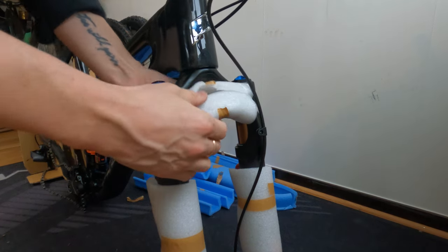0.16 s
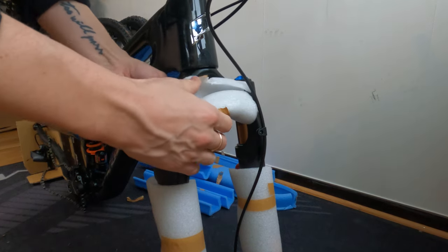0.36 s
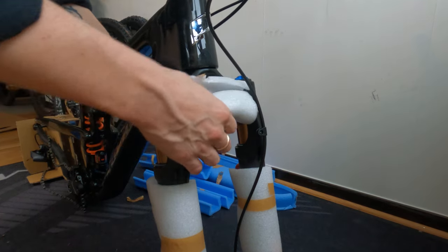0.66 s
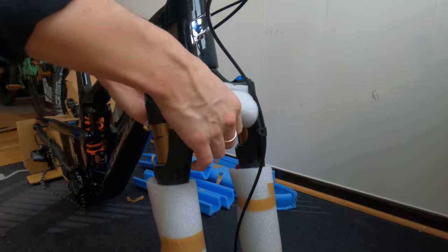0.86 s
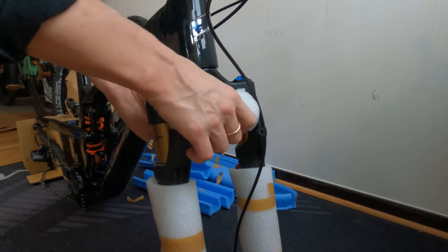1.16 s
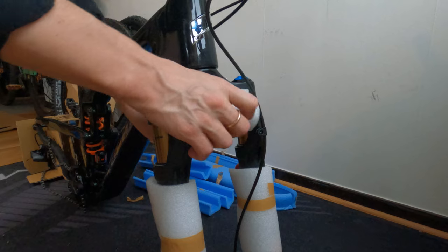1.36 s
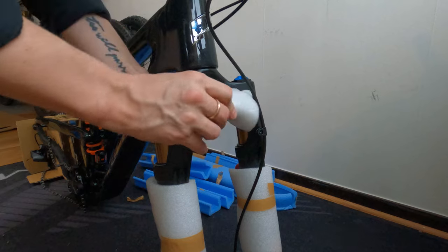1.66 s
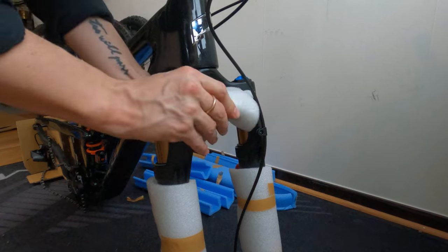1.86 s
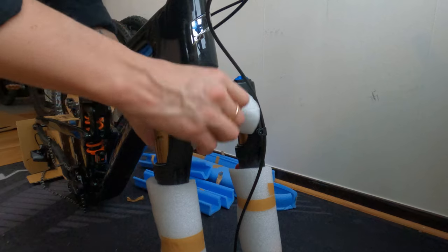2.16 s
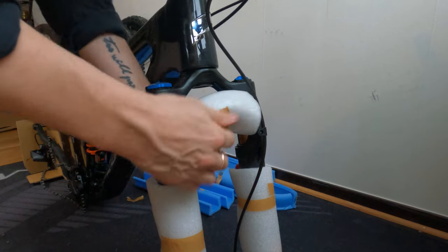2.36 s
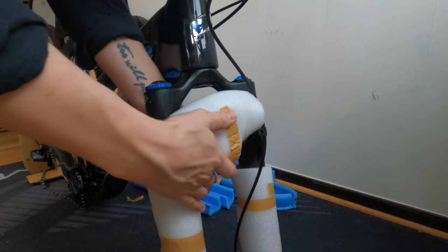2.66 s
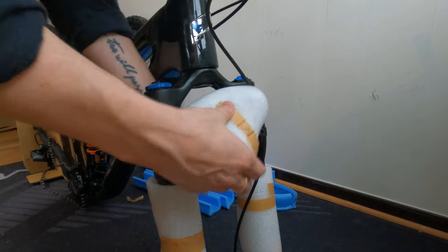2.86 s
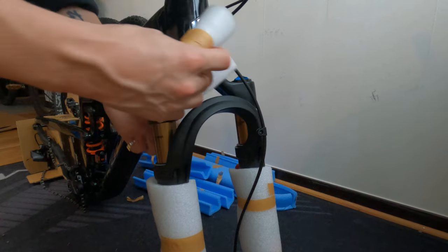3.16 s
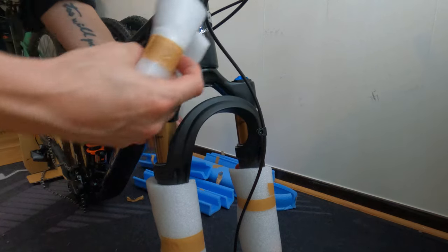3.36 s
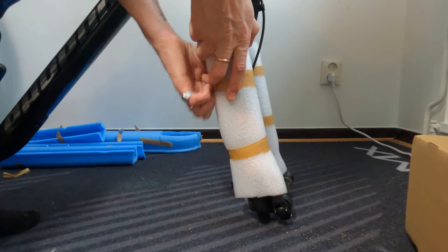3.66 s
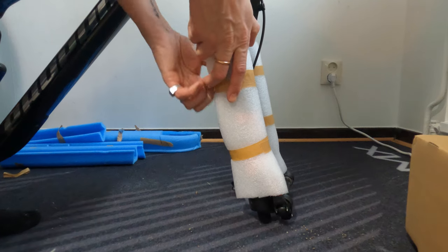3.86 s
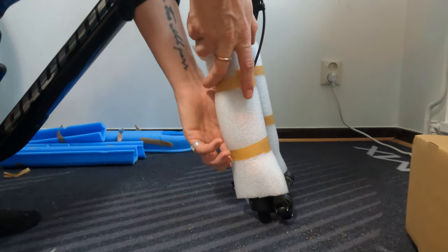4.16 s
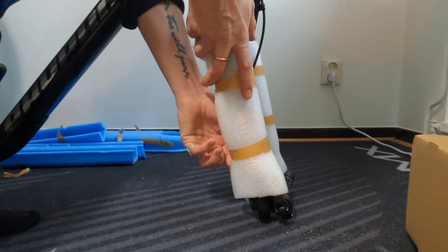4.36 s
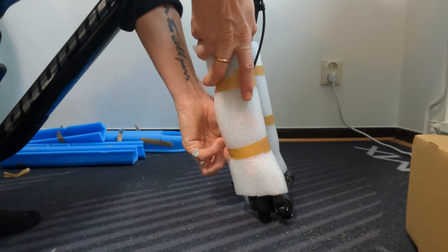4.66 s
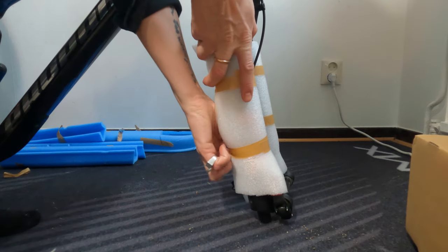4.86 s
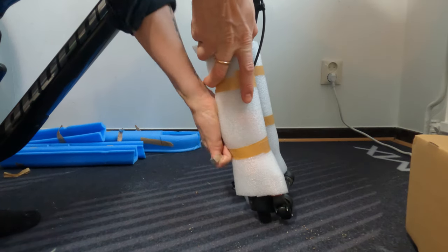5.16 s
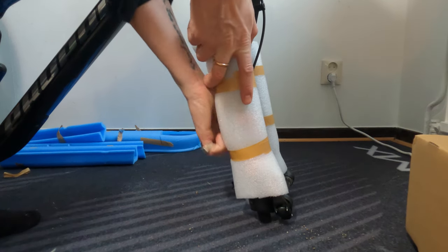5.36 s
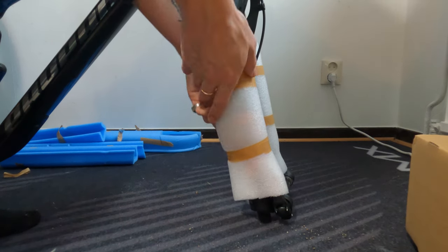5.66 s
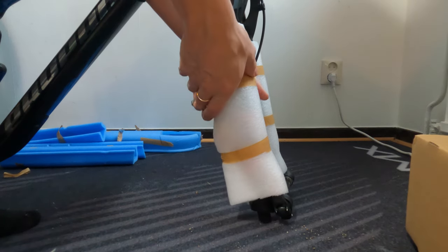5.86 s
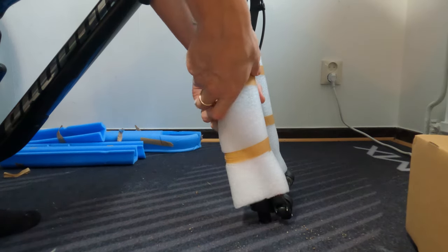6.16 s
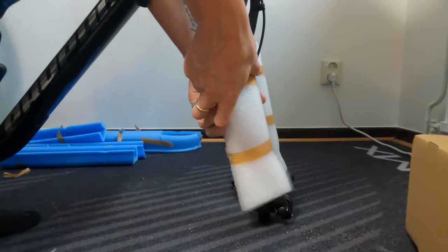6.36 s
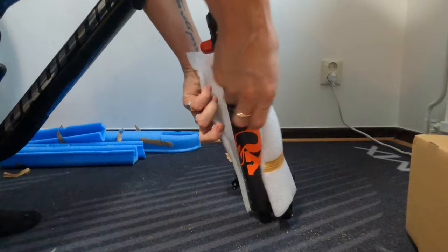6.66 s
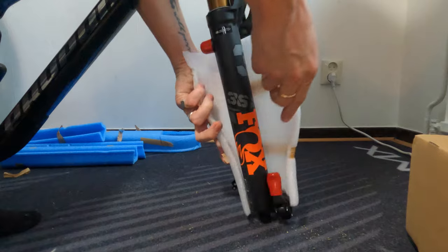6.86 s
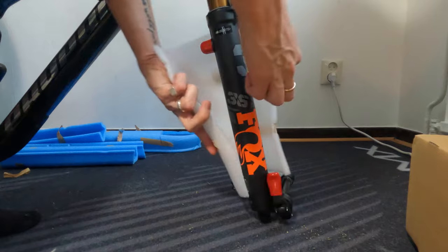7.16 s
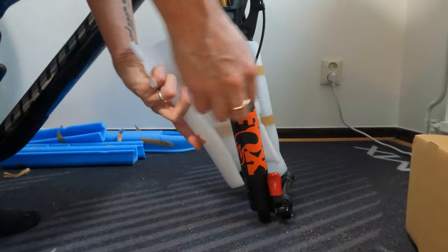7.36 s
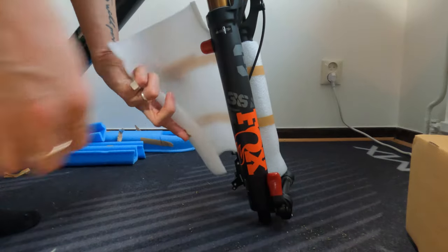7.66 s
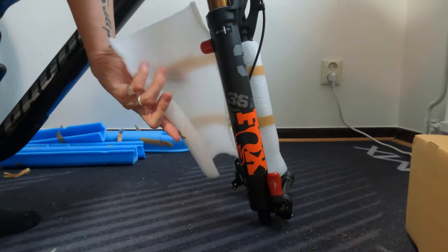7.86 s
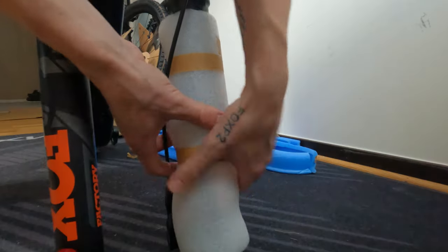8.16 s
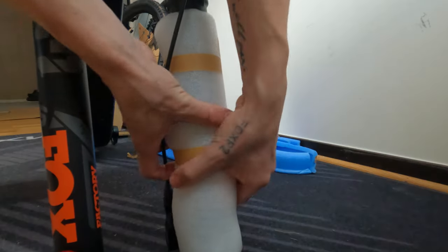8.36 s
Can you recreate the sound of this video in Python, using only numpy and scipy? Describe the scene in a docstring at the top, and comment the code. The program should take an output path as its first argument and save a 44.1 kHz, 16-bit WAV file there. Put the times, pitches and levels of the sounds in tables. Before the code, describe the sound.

Close stereo handling in a small bare room, with very faint room air and a slight low hum early on. From 0 to 0.5 s fingers lightly rub foam; around 0.6-1.05 s a gripped sleeve drags with hollow, pitched squeaky surges. Soft rubbing and crinkles follow, then a firmer scrape at 2.1 s. Pulling swells into dull snaps at 2.8 and 3.1 s, with a hollow foam bump at 3.25 s. A loud bright tape snap hits at 3.75 s, shaking the fork. Quiet hissing and small ticks lead to the hardest snap at 5.2 s, with a low jolt. Scraping at 5.4 s, then from 5.85 to 6.45 s foam rips in dense separate cracks, ending in a sharp snap and thump at 6.5 s. Softer rustles and light bumps continue until 8 s, when rubbing strengthens and several short snaps sound from 8.2 to 8.45 s.

```python
"""Foam rubs and crinkles, taut tape parts with sharp snaps that jolt a bicycle fork, and one sleeve rips
open in a run of separate cracks, as hands strip taped foam sleeves off the fork in a small bare room.
Rubbing and dragging are clumped slips through resonances; snaps, rips and crinkles are filtered noise bursts;
the fork is a set of decaying modes. A diffuse room, two close ports and a limiter follow."""
import sys
import numpy as np
from scipy import signal
from scipy.fft import rfft, irfft
from scipy.io import wavfile
from scipy.ndimage import uniform_filter1d, minimum_filter1d, map_coordinates

SR = 44100
rng = np.random.default_rng(int(sys.argv[2]) if len(sys.argv) > 2 else 0)


def master_out(mix):
    """Clip the mix to full scale and print it as 16-bit PCM to the path in sys.argv[1]."""
    frames = np.transpose(np.atleast_2d(mix))
    ceiling = np.clip(frames, -1, 1)
    pcm = np.round(ceiling * 32767).astype(np.int16)
    wavfile.write(sys.argv[1], SR, pcm)


N = 374850
TIME = np.arange(N) / SR
SIZE = 4096   # filter and burst length, samples
BINS_HZ = np.maximum(np.arange(SIZE // 2 + 1) * SR / SIZE, 1)

# hands resting on the foam: (time [s], scrape level [dB], hiss level [dB])
CONTACT = [(0, -63.5, -61), (0.48, -69.5, -102), (0.56, -53.5, -66), (1.2, -56.5, -62), (1.28, -62, -85),
           (1.55, -52.5, -62.5), (1.96, -67.5, -77.5), (2.3, -51.5, -57.5), (3.3, -50.5, -55),
           (3.43, -80.5, -86), (4.04, -63, -63.5), (4.4, -66, -55.5), (4.62, -57.5, -56.5),
           (4.7, -76.5, -67.5), (4.9, -65.5, -60.5), (6.77, -56.5, -61.5), (7.15, -64.5, -63.5),
           (7.75, -64.5, -72.5), (8.2, -52.5, -51.5)]
# hiss of foam on skin: (frequency [Hz], level [dB])
HISS_COLOUR = [(1400, -16.5), (2800, -2), (4000, -2), (5200, -10.5), (6300, -4), (7400, -3.5), (8400, -12),
               (10500, -20.5), (13000, -25.5), (15500, -44)]
# parting tape and buckling creases: (frequency [Hz], level [dB])
SNAP_COLOUR = [(100, -30.5), (450, -17), (850, -10.5), (1200, -0.5), (1700, 3.5), (2500, -4.5),
               (3300, -4.5), (4500, -11.5), (7000, -9.5), (10000, -23), (15000, -41)]
# resonances of the hollow sleeve: (frequency [Hz], width [Hz], level [dB])
SLEEVE = [(157, 30, -5), (297, 47, -10), (434, 73, -16.5), (647, 60, -13.5), (1030, 200, -14)]


def from_db(db):
    """Decibels to gain."""
    return 10 ** (np.asarray(db) / 20)


def rms_one(x):
    """Scale to rms 1."""
    return x / np.sqrt(np.mean(x ** 2) + 1e-20)


def levels(rows):
    """The dB columns of a curve as gains at every sample, silent outside it."""
    s, *columns = np.transpose(rows)
    inside = (TIME >= s[0]) * (TIME <= s[-1])
    return [from_db(np.interp(TIME, s, column)) * inside for column in columns]


def at_hz(points, hz):
    """Read a table on a log-frequency axis."""
    points = np.array(points)
    return np.interp(np.log(hz), np.log(points[:, 0]), points[:, 1])


def colour(x, spectrum, extra_db=0):
    """Causal (minimum-phase) filter with the given spectrum, by folding its cepstrum."""
    cepstrum = irfft(np.log(from_db(at_hz(spectrum, BINS_HZ) + extra_db)))
    cepstrum[1:SIZE // 2] *= 2
    cepstrum[SIZE // 2 + 1:] = 0
    response = irfft(np.exp(rfft(cepstrum, axis=0)))
    return signal.fftconvolve(x, response)[:len(x)]


def resonance(x, hz, width_hz):
    """Two-pole resonance with gain 1 on top."""
    r = np.exp(-np.pi * width_hz / SR)
    zeros = np.array([1, 0, -1]) * (1 - r * r) / 2
    poles = [1, -2 * r * np.cos(2 * np.pi * hz / SR), r * r]
    return signal.lfilter(zeros, poles, x)


def body(x, modes):
    """Resonances in parallel, signs alternating."""
    return sum((-1) ** k * from_db(db) * resonance(x, hz, width_hz)
               for k, (hz, width_hz, db) in enumerate(modes))


def drift(rate_hz):
    """Slow chance with a spread of about 1: random values joined by straight lines."""
    return np.interp(TIME * rate_hz, np.arange(SIZE), rng.standard_normal(SIZE))


def fade(t, t60):
    """Exponential decay by 60 dB in t60 seconds."""
    return np.exp(-np.log(1000) * t / t60)


def glide(x, octaves):
    """Read a sound faster or slower, so that its resonances move."""
    return map_coordinates(x, [np.cumsum(2 ** octaves) % (len(x) - 1)], order=3)


def add(out, s, sound):
    """Mix a sound in at time s."""
    at = max(round(s * SR), 0)
    out[at:at + len(sound)] += sound[:N - at]


def friction(per_s, spread_db, uneven_db, smooth):
    """Foam cells catch and slip: clumped clicks of uneven size over a smooth sliding noise."""
    sizes = from_db(spread_db * np.minimum(rng.exponential(1, N), 5)) * rng.choice([-1, 1], N)
    slips = rms_one(sizes * (rng.random(N) < per_s / SR))
    sliding = smooth * rng.standard_normal(N)
    return rms_one((slips + sliding) * from_db(uneven_db * drift(110)))


def fibres(burst_s, flutter, flutter_t60):
    """Force of one break: a burst of fibres parting swells and stops, then the loose edge flutters."""
    t = TIME[:SIZE]
    burst = t / burst_s * np.exp((1 - (t / burst_s) ** 2) / 2)
    return rng.standard_normal(SIZE) * (burst + flutter * fade(t, flutter_t60))


def crack(force, spectrum, tilt_db, rings, ring_octaves):
    """One break, rung by the freed piece at rings (Hz, dB); scaled by energy to a peak of about 1."""
    # every break holds the same force in each broad band; only its fine grain is chance
    force_db = 10 * np.log10(uniform_filter1d(np.abs(rfft(force)) ** 2, size=60))
    piece_db = tilt_db * np.log2(np.clip(BINS_HZ, 700, 6000) / 2000)
    for hz, db in rings:
        piece_db = piece_db + db / (1 + (np.log2(BINS_HZ / hz) / ring_octaves) ** 2)
    sound = colour(force, spectrum, piece_db - force_db)
    return sound / np.sqrt(np.sum(sound ** 2) / (0.0002 * SR))


def thud(flap, t60):
    """The released sleeve wall is knocked and flaps briefly; peak 1."""
    # (frequency [Hz], level [dB])
    thud_colour = [(50, -40.5), (105, -10), (170, 6.5), (250, 4), (350, -3.5), (550, 0), (1000, -24),
                   (3000, -92.5)]
    force = flap * rng.standard_normal(SIZE) * fade(TIME[:SIZE], t60)
    force[0] += 1
    sound = colour(force, thud_colour)
    return sound / np.abs(sound).max()


def struck(modes):
    """Decaying modes, each with a little chance in its strength."""
    t, out = TIME[:SR], 0
    for k, (hz, db, t60) in enumerate(modes):
        strength = from_db(db + rng.normal()) * (-1) ** k
        out = out + strength * np.sin(2 * np.pi * hz * t) * fade(t, t60)
    return out


def background():
    """Still room air as coloured noise, and a faint hum of unsteady sines."""
    # low hum somewhere in the house: (time [s], level [dB])
    hum_curve = [(0, -81), (1.2, -72), (1.6, -63.5), (2.4, -61.5), (2.52, -101)]
    # (frequency [Hz], level [dB])
    hum_tones = [(64.6, 0.5), (210, -12.5), (398, -13)]
    # room air: (frequency [Hz], level [dB])
    air_colour = [(40, 5.5), (95, -17), (160, 4), (300, -6.5), (700, -20.5), (3500, -20.5), (5200, -41),
                  (7000, -8.5), (10000, -26.5), (14000, -36), (16000, -56)]
    air_db = -68
    tones = sum(from_db(db + 2.0 * drift(26.0)) * np.sin(2 * np.pi * hz * TIME) for hz, db in hum_tones)
    air = rms_one(colour(rng.standard_normal(N), air_colour))
    return levels(hum_curve)[0] * rms_one(tones) + from_db(air_db) * air


def strokes():
    """Scrape, hiss and flex gains: each stroke sets in quickly, swells or eases, then lets go."""
    # hand strokes over the foam: (start [s], length [s], scrape level [dB], skin hiss level [dB],
    # hollow flexing level [dB], swell from start to end [dB])
    stroke_rows = [(0.146, 0.24, -62.5, -66.5, -84, 5), (1.377, 0.16, -55.5, -63.5, -66.5, 2),
                   (2.021, 0.055, -57, -61.5, -76, 3), (2.113, 0.12, -38.5, -54, -60, 2.5),
                   (2.243, .14, -43, -51.5, -56.5, -3.5), (2.439, 0.045, -44.5, -53, -60, 1),
                   (2.721, 0.12, -47.5, -49, -61, 18), (2.891, 0.13, -49, -48.5, -58.5, 12),
                   (3.1, 0.16, -45.5, -48.5, -49, -1), (3.331, 0.017, -48, -49, -57.5, 5.5),
                   (3.487, 0.059, -51, -58.5, -58.5, -5), (3.558, 0.22, -58, -57.5, -69, -2.5),
                   (4.053, 0.15, -51, -52.5, -72, 13), (4.224, 0.078, -71, -48.5, -90, -7),
                   (5.391, 0.044, -41, -48, -41, -6), (5.459, 0.13, -52.5, -51.5, -62, -2.5),
                   (5.591, 0.088, -47.5, -48.5, -79, 3), (5.88, 0.049, -47, -54.5, -51.5, 3),
                   (5.937, 0.28, -43.5, -48, -46, -5.5), (6.211, 0.23, -41.5, -47, -45.5, 10),
                   (6.461, 0.19, -42, -57, -48.5, -1.5), (6.92, 0.18, -61.5, -61.5, -64, 3),
                   (7.308, 0.083, -49.5, -53.5, -56, -7), (7.39, 0.23, -63.5, -53.5, -63, 11),
                   (8.001, 0.014, -59, -47.5, -43, 6), (8.096, 0.16, -44, -45, -49.5, 7.5),
                   (8.284, 0.2, -40.5, -45.5, -55.5, 5)]
    attack_s, release_t60 = 0.016, 0.11
    gains, t = np.zeros((3, N)), TIME[:SR]
    for s, length_s, *stroke_db, swell_db in stroke_rows:
        swell = from_db(swell_db * (np.minimum(t / length_s, 1) - .5))
        release = fade(np.maximum(t - length_s, 0), release_t60)
        shape = np.minimum(t / attack_s, 1) * swell * release
        for gain, level_db in zip(gains, stroke_db):
            add(gain, s, from_db(level_db) * shape)
    return gains


def rubbing():
    """Sliding foam flexes in the bass, scrapes in the middle and hisses on skin; flex and scrape pitch wander."""
    # bending foam: (frequency [Hz], level [dB])
    flex_colour = [(70, -35.5), (115, -14), (165, 3.5), (280, 3), (430, 4), (630, 3.5), (800, -18),
                   (1300, -48)]
    # scraping cells: (frequency [Hz], level [dB])
    scrape_colour = [(550, -25), (830, -4), (1100, 4), (1600, 6.5), (2400, 2.5), (3300, -18), (5000, -51.5),
                     (9000, -57.5)]
    contact_flex_db = -8   # under a resting hand, relative to its scrape
    scrape_wander_octaves, sleeve_wander_octaves = .13, .05   # as the grip shifts
    scrape, hiss = levels(CONTACT)
    resting = [scrape, hiss, scrape * from_db(contact_flex_db)]
    scrape, hiss, flex = np.hypot(resting, strokes())

    creep = friction(per_s=370, spread_db=0.5, uneven_db=6.5, smooth=0.77)
    wall = rms_one(colour(creep, flex_colour)) + from_db(-5.0) * rms_one(body(creep, SLEEVE))
    wall = rms_one(glide(wall, sleeve_wander_octaves * drift(14)))
    cells = colour(friction(per_s=450, spread_db=3.3, uneven_db=3.5, smooth=1.0), scrape_colour)
    cells = rms_one(glide(cells, scrape_wander_octaves * drift(28)))
    skin = rms_one(colour(friction(per_s=1200, spread_db=0.5, uneven_db=2.5, smooth=1.4), HISS_COLOUR))
    return flex * from_db(-3.5) * wall + scrape * from_db(-2.5) * cells + hiss * from_db(2.14) * skin


def ticking():
    """Single foam cells give way at random under the fingers, scaled by the hiss of the resting contact."""
    ticks_per_s, tick_db, spread_db = 22, 15.5, 1   # least level relative to that hiss, and random excess
    peak_db = tick_db + spread_db * np.minimum(rng.exponential(1, N), 3)
    hiss = levels(CONTACT)[1]
    clicks = (rng.random(N) < ticks_per_s / SR) * from_db(peak_db) * hiss
    force = fibres(burst_s=.0005, flutter=.2, flutter_t60=.02)
    tick = crack(force, HISS_COLOUR, tilt_db=2, rings=[], ring_octaves=1)
    return signal.fftconvolve(clicks, tick)[:N]


def crinkling():
    """Creases of tape and foam buckle softly as the fingers shift: small ringing bursts."""
    # (time [s], relative level [dB], pitch [Hz])
    crinkle_rows = [(0.042, -32, 1300), (0.611, -25, 1210), (0.624, -21.5, 1300), (1.399, -29.5, 1464),
                    (1.516, -27, 1050), (1.55, -28.5, 1490), (1.632, -23, 1560), (1.639, -22.5, 1240),
                    (1.905, -38, 1400), (2.135, -33, 1500), (2.146, -21, 1670), (2.213, -22, 1400),
                    (2.305, -20, 2210), (2.419, -25.5, 2680), (2.549, -29.5, 7100), (3.254, -19, 1150),
                    (3.349, -26.5, 2030), (3.509, -29.5, 2710), (3.526, -19, 2050), (3.7334, -27.5, 2600),
                    (4.005, -29.5, 2800), (4.221, -21, 3050), (4.381, -32, 4500), (4.622, -37.5, 3950),
                    (4.766, -25, 3370), (4.946, -32, 6880), (5.074, -31.5, 7040), (5.174, -30.5, 6500),
                    (5.2011, -23, 1900), (5.398, -21, 2210), (5.412, -20.5, 1900), (5.421, -28, 2000),
                    (5.43, -27, 3000), (5.527, -23, 2230), (5.607, -26.5, 3100), (5.628, -24, 2550),
                    (7.343, -44, 2400), (8.015, -27.5, 1920), (8.112, -27, 1920), (8.214, -21, 1290),
                    (8.238, -24, 1800)]
    out = np.zeros(N)
    for s, level_db, hz in crinkle_rows:
        force = fibres(burst_s=0.0006, flutter=0.4, flutter_t60=0.045)
        tilt_db = 4.5 * np.log2(hz / 1600)
        tick = crack(force, SNAP_COLOUR, tilt_db, [(hz, 7)], ring_octaves=.2)
        add(out, s + 0.00045, from_db(level_db - 1.5) * tick)
    return out


def dragging():
    """Under a tight grip slips surge and sound the air in the sleeve; each surge squeezes it to a pitch."""
    # surges: (time of fastest slip [s], relative level [dB], swell time [s], cavity pitch ratio [1])
    drag_rows = [(0.612, -39, 0.0097, .94), (0.699, -45, 0.018, .97), (0.897, -48, 0.016, 1.04),
                 (0.949, -40.5, 0.018, 1.0), (0.977, -39, 0.0107, 1.04), (1.009, -37, 0.0098, 1.0),
                 (1.045, -36, 0.0196, .96)]
    # air in the gripped sleeve: (frequency [Hz], width [Hz], level [dB])
    cavity = [(280, 36, -12), (516, 25, 2), (647, 82, -5), (1067, 78, -1), (1173, 23, 9), (1610, 190, -1),
              (2500, 410, -7), (3180, 840, -11), (6430, 2500, -15)]
    wander_octaves = 0.035
    slips = friction(per_s=550, spread_db=1.5, uneven_db=0.5, smooth=1.0)
    band = signal.butter(2, [220, 5600], "band", fs=SR, output="sos")
    hollow = signal.sosfilt(band, body(slips, cavity))

    surges = [from_db(db) / np.cosh(np.clip((TIME - s) / swell_s, -20, 20)) for s, db, swell_s, _ in drag_rows]
    speed = sum(surges)
    squeeze = sum(surge * np.log2(row[-1]) for surge, row in zip(surges, drag_rows)) / speed
    hollow = rms_one(glide(hollow, squeeze + wander_octaves * drift(45)))
    # slow slips are duller
    dull = signal.sosfilt(signal.butter(1, 1800, fs=SR, output="sos"), hollow)
    brightness = (speed / speed.max()) ** 0.1
    return speed * from_db(2.0) * (dull + brightness * (hollow - dull))


def bumping():
    """A push sounds the sleeve, above all the stretch under the fingers, whose pitch slides as it bends."""
    # soft pushes flexing the foam: (time of middle [s], level [dB], Gaussian length [s], main ring [Hz],
    # its glide [octaves/s], rest of the sleeve relative to the main ring [dB])
    bump_rows = [(0.694, -52, 0.02, 194, -1.5, -3), (2.998, -37.5, 0.015, 1087, 2, 2.5),
                 (3.262, -33, 0.0043, 1020, 3.5, 5.5), (3.351, -40, 0.006, 442, 2, 11),
                 (4.393, -54.5, 0.0027, 378, -2, -8), (4.622, -49.5, 0.0067, 650, 1.5, -3),
                 (4.773, -52, 0.0039, 408, -2.5, 3.5), (5.404, -47.5, 0.0095, 767, -4.5, -12),
                 (6.99, -59.5, 0.089, 280, 1.1, 2.5), (7.018, -61.5, 0.082, 920, -0.5, -11),
                 (7.297, -51, 0.031, 401, -6.5, 4), (7.342, -43.5, 0.0065, 638, 0.5, -0.5),
                 (7.596, -52.5, 0.012, 179, 0, 3), (7.925, -53.5, 0.009, 402, -3.5, -14),
                 (8.01, -56, 0.057, 625, -0.2, -13), (8.034, -43.5, 0.0056, 370, -8.5, -5.5),
                 (8.251, -51, 0.012, 190, 2.5, 4), (8.31, -46, 0.012, 230, 3.5, 9)]
    width_hz = 120   # of each of two resonances in series
    out, t = np.zeros(N), TIME[:SR] - TIME[SR // 2]
    for s, level_db, length_s, hz, octaves_per_s, sleeve_db in bump_rows:
        push = rng.standard_normal(SR)
        stretch = resonance(resonance(push, hz, width_hz), hz, width_hz)
        stretch = rms_one(glide(stretch, np.clip(octaves_per_s * t, -.5, .5)))
        wall = stretch + from_db(sleeve_db) * rms_one(body(push, SLEEVE))
        shape = np.exp(-(t / length_s) ** 2 / 2)
        wall_rms = np.sqrt(np.average(wall ** 2, weights=shape ** 2))
        add(out, s + t[0], from_db(level_db) * wall * shape / wall_rms)
    return out


def snapping(ring_db, grainy):
    """Taut tape parts at once, brighter the tighter it was; without grain the force is a plain click."""
    # tape and foam letting go: (time [s], relative level [dB], relative sleeve thud level [dB],
    # brightness [dB/octave], three ring pitches of the freed piece [Hz, Hz, Hz])
    snap_rows = [(2.121, -20, -73, -4.5, 1600, 1830, 3000), (2.828, -5.5, -30, -8, 1120, 1550, 2800),
                 (3.124, -9, -34, -11.5, 1140, 1760, 680), (3.743, -16.5, -39.5, 0.5, 1700, 3400, 5400),
                 (3.754, 9.5, -20.5, 2.9, 2100, 2750, 3630), (5.212, -11, -36, -6, 1000, 2440, 3400),
                 (5.223, 15, -7, 0.6, 2330, 3370, 1594), (6.476, -14, -31, 5, 1700, 1950, 3280),
                 (6.486, 2.5, -17.5, -1, 1750, 2150, 3460), (8.175, -9.5, -39.5, 0, 1320, 1660, 3830),
                 (8.322, -3.5, -33.5, -1.5, 1460, 2750, 7200), (8.4112, -2.5, -34, .5, 1380, 1740, 2670),
                 (8.443, -3, -35, -0.5, 1390, 1750, 2670)]
    ring_octaves = 0.16   # half-width
    out = np.zeros(N)
    for s, level_db, thud_db, tilt_db, *pitches_hz in snap_rows:
        if grainy:
            force = fibres(burst_s=.0005, flutter=.14, flutter_t60=.03)
        else:
            force = signal.unit_impulse(SIZE)
        rings = [(hz, ring_db) for hz in pitches_hz]
        snap = from_db(level_db + 0.5) * crack(force, SNAP_COLOUR, tilt_db, rings, ring_octaves)
        wall = from_db(thud_db + 0.5) * thud(flap=0.16, t60=0.033)
        add(out, s + .0004, snap + wall)
    return out


def fork():
    """A sudden release rings the fork and sets the whole bicycle swaying: two sets of decaying modes."""
    # (time [s], ring level [dB], sway level [dB])
    jolt_rows = [(2.828, -43, -57), (3.257, -49, -43), (3.757, -41, -28), (5.225, -21.5, -24.5),
                 (6.369, -44, -56), (6.486, -26, -42)]
    # fork: (frequency [Hz], level [dB], t60 [s])
    fork_modes = [(89, -6, 0.11), (119, 1, 0.084), (146.2, -5, .27), (172, -10.5, 0.17), (211.5, -9, 0.21),
                  (255.4, -9.5, 0.091), (295, -16.5, 0.31)]
    # whole bicycle: (frequency [Hz], level [dB], t60 [s])
    frame_modes = [(39, 2, 0.37), (62.2, -3, 0.46), (81, 4.5, 0.087)]
    out = np.zeros(N)
    for s, ring_db, sway_db in jolt_rows:
        add(out, s, from_db(ring_db) * struck(fork_modes) + from_db(sway_db) * struck(frame_modes))
    return out


def ripping():
    """The tear jumps in bursts of breaking cells; sharp ones ring, and the loosening wall thuds ever more."""
    # foam bridges breaking: (time [s], relative level [dB], sharpness [dB], ring of the breaking cells [Hz])
    rip_rows = [(5.8488, -26, 1.5, 6460), (5.896, -29, -3.5, 2700), (5.913, -26.5, -8, 2800),
                (5.9315, -20.5, -3, 4210), (5.9503, -18, -5.5, 4190), (5.964, -19.5, -0.5, 4350),
                (5.9773, -13.5, -2, 4200), (6.0083, -11, 3.5, 5700), (6.0208, -16, 0, 4800),
                (6.0393, -11, 6.5, 5810), (6.0598, -16, -1.5, 5170), (6.0834, -16.5, 0, 5870),
                (6.1071, -9.5, 6.5, 5730), (6.124, -19.5, -4, 4010), (6.1384, -12, 3.5, 5640),
                (6.1576, -12, -2.5, 5110), (6.187, -9, 5, 6540), (6.2193, -9, -2.5, 4640),
                (6.2232, -15, 3.5, 4770), (6.27, -10.5, 8, 6530), (6.2948, -10, 0.5, 4950),
                (6.302, -9, 1, 6750), (6.3378, -9.5, 5.5, 6690), (6.3666, -10.5, 1, 4960),
                (6.3708, -11, 1, 6650), (6.4278, -14, -1, 7190), (6.4354, -13.5, 3.5, 4850)]
    # (frequency [Hz], level [dB])
    rip_colour = [(100, -17.5), (250, 3.5), (600, 6), (1500, 3.5), (2100, 5.5), (3200, 2), (6500, -1.5),
                  (8500, -6), (10500, -17.5), (13000, -17.5), (16000, -42)]
    thud_rel_db, thud_growth_db_per_s = -18, 6   # relative to each break; grows as the slit lengthens
    thud_per_sharp = -.8   # dB per dB of sharpness: a clean break hardly drags the wall
    wall_ring_db, ring_octaves = 10, 0.16   # half-width of both rings
    out = np.zeros(N)
    for s, level_db, sharp_db, cell_hz in rip_rows:
        wall_hz = 1420 if sharp_db > .5 else 1030   # a sharp break rings a shorter stretch of wall
        rings = [(wall_hz, wall_ring_db), (cell_hz, np.clip(7.5 + 0.89 * sharp_db, 2, 13))]
        growth_db = thud_growth_db_per_s * (s - rip_rows[0][0])
        thud_db = level_db + thud_rel_db + growth_db + thud_per_sharp * sharp_db
        force = fibres(burst_s=.001, flutter=.3, flutter_t60=.03)
        burst = from_db(level_db + 1.0) * crack(force, rip_colour, .5 * sharp_db, rings, ring_octaves)
        add(out, s + 0.00071, burst + from_db(thud_db) * thud(flap=0.08, t60=0.026))
    return out


def room(x, build_s):
    """Diffuse reflections build up, then die away octave by octave: decaying noise of unit energy."""
    # (frequency [Hz], t60 [s])
    room_t60 = [(100, 0.12), (500, 0.41), (1800, 0.68), (4000, 0.87), (8000, 0.17)]
    # (frequency [Hz], gain [dB])
    room_gain = [(100, 22), (360, 13.5), (750, 9.5), (1150, 8.5), (1700, 5), (2900, 0), (5800, 5),
                 (8000, -11), (11500, 1), (15000, -9)]
    t, tail = TIME[:SR], 0
    for hz in np.geomspace(90, 11520, 8):
        band = signal.butter(2, [hz / np.sqrt(2), hz * np.sqrt(2)], "band", fs=SR, output="sos")
        tail = tail + signal.sosfilt(band, rng.standard_normal(SR)) * fade(t, at_hz(room_t60, hz))
    tail = colour(tail, room_gain) * (1 - np.exp(-t / build_s))
    return signal.fftconvolve(x, tail / np.sqrt(np.sum(tail ** 2)))[:N]


def microphones(x, scatter_t60):
    """Two close ports differ in level and phase by frequency; a scattered side signal sets them apart."""
    # (frequency [Hz], side level [dB])
    side_colour = [(50, -33), (500, -11), (2000, -20), (4500, -15.5), (8000, -14.5), (13000, -2)]
    # (frequency [Hz], left-right level [dB], left lead [rad])
    lean = [(50, -2, 0), (500, -3, 0.05), (1400, -1.6, -0.33), (3120, -1.6, -0.71), (6200, -0.5, -0.037),
            (12000, 4.5, -0.061)]
    scatter = rng.standard_normal(SIZE) * fade(TIME[:SIZE], scatter_t60) * TIME[:SIZE]
    scatter = scatter / np.sqrt(np.sum(scatter ** 2))
    side = colour(signal.fftconvolve(x, scatter)[:N], side_colour)
    hz = np.maximum(np.arange(N // 2 + 1) * SR / N, 1)
    lead_rad = at_hz(np.array(lean)[:, ::2], hz)
    half = from_db(at_hz(lean, hz) / 2) * np.exp(.5j * lead_rad)   # half of the difference per port
    return np.array([irfft(rfft(x) * half ** sign, N) + sign * side for sign in (1, -1)])


def limiter(x):
    """The gain drops just ahead of a peak above the ceiling and recovers at a steady rate in dB."""
    ceiling_db, recovery_db_per_s = 4.5, 82.5
    over_db = np.maximum(20 * np.log10(np.abs(x).max(axis=0) + 1e-9) - ceiling_db, 0)
    recovery_db = recovery_db_per_s * TIME
    gain_db = recovery_db - np.maximum.accumulate(over_db + recovery_db)
    return x * from_db(uniform_filter1d(minimum_filter1d(gain_db, size=65), size=65))


def scene():
    """Close handling sounds with the room behind them."""
    snap_ring_db, snap_room_ring_db = 8.5, 5   # height of the rings: direct, and in what reaches the walls
    room_side_db, room_side_hz = -9, 700   # reflections that differ between the ports, above this pitch
    small = ripping() + crinkling() + ticking()
    breaks = small + snapping(snap_ring_db, grainy=True)
    # heard from all sides at once, rings and grain even out
    radiated = small + snapping(snap_room_ring_db, grainy=False)
    handling = rubbing() + dragging() + bumping() + fork()
    sent = from_db(-23.0) * radiated + from_db(-19.5) * handling

    scattered = signal.sosfilt(signal.butter(1, room_side_hz, "high", fs=SR, output="sos"), sent)
    sideways = from_db(room_side_db) * room(scattered, build_s=.015) * [[1], [-1]]
    centre = breaks + handling + room(sent, build_s=0.0031) + background()
    return microphones(centre, scatter_t60=0.011) + sideways


def record(dry):
    """The loudest peaks are limited and rounded off; the top is cut."""
    cutoff_hz = 16550   # 85 dB down from here on
    held = limiter(dry)
    clipped = held / (1 + held ** 6) ** (1 / 6)
    return signal.sosfilt(signal.cheby2(20, 85, cutoff_hz, fs=SR, output="sos"), clipped)


dry = scene()
out = record(dry)
master_out(out)
```